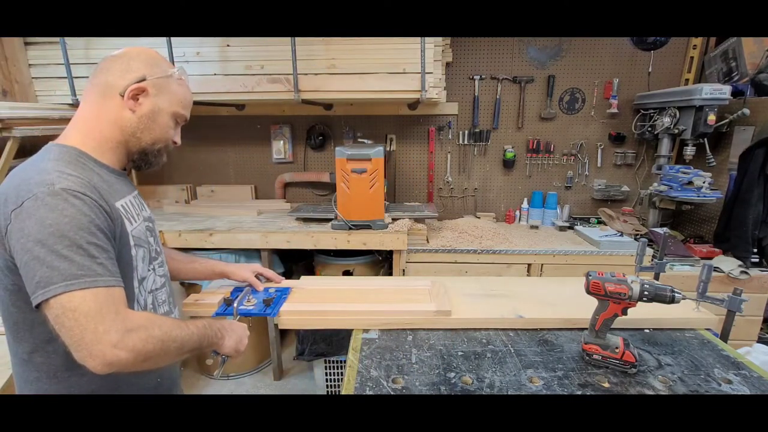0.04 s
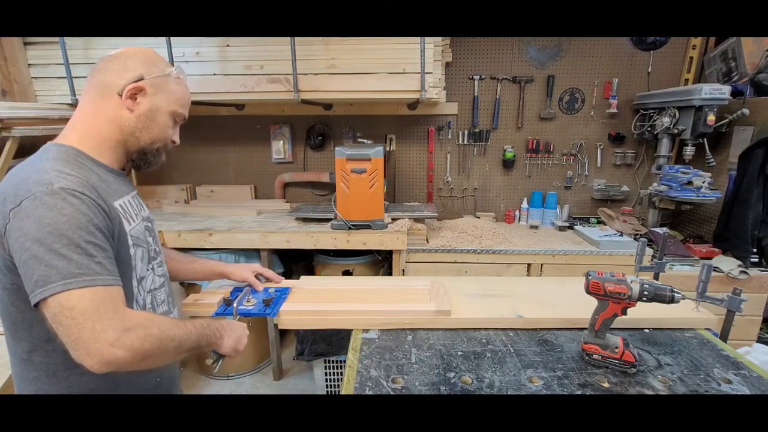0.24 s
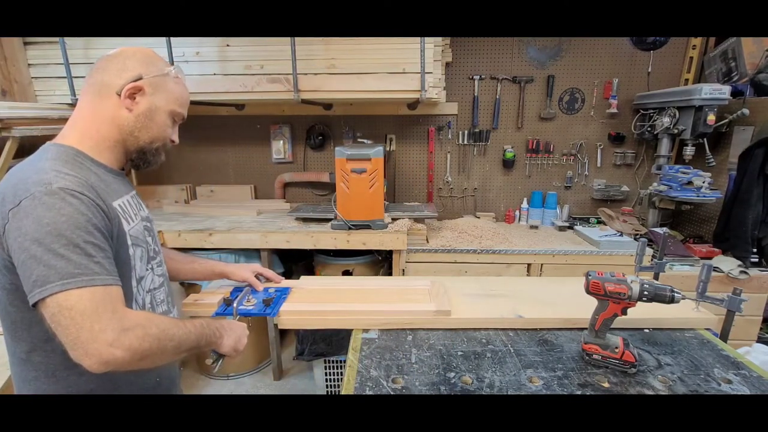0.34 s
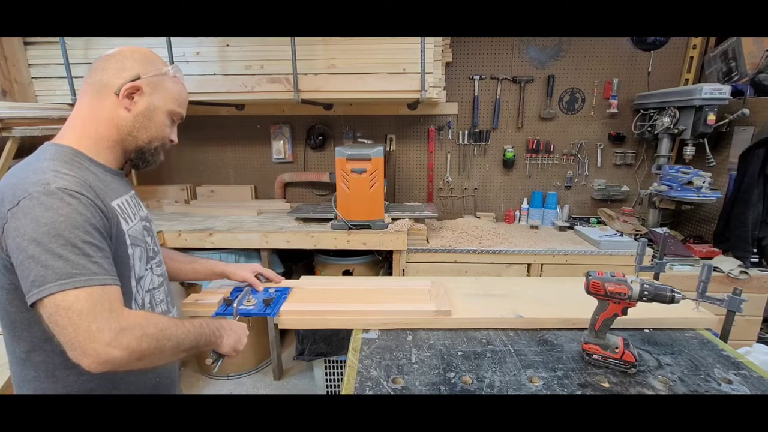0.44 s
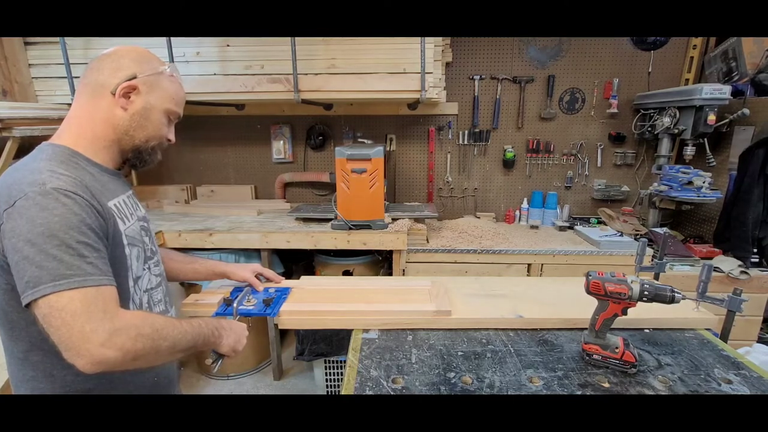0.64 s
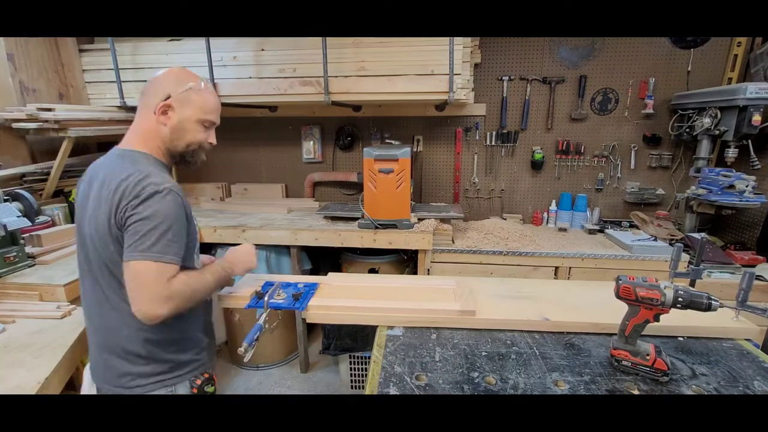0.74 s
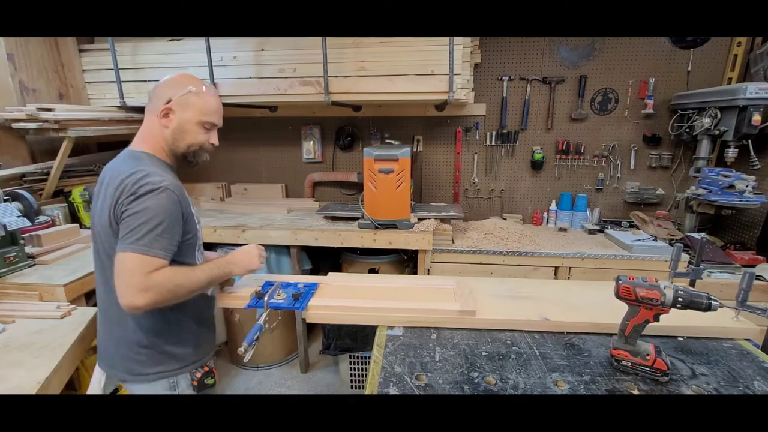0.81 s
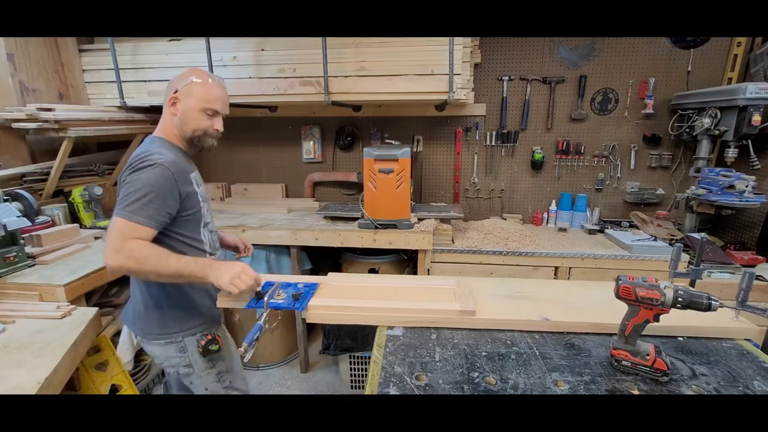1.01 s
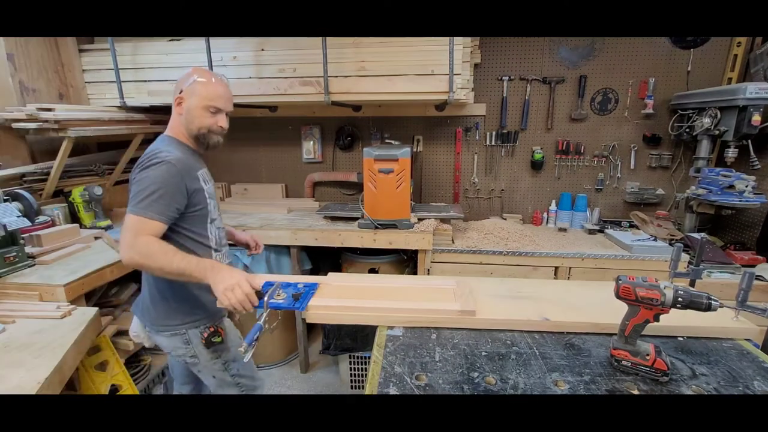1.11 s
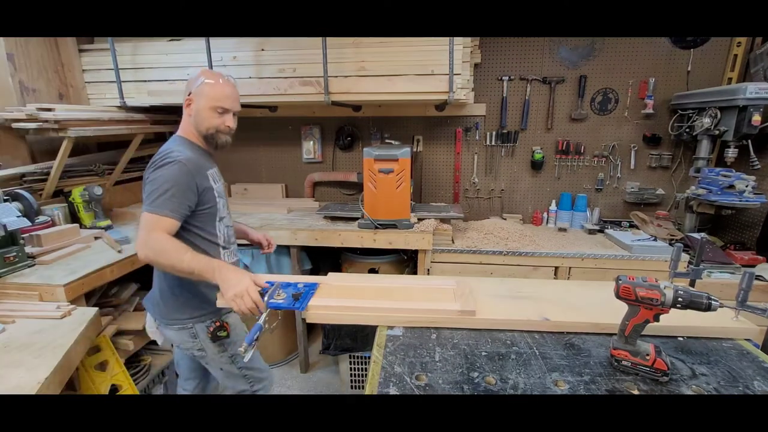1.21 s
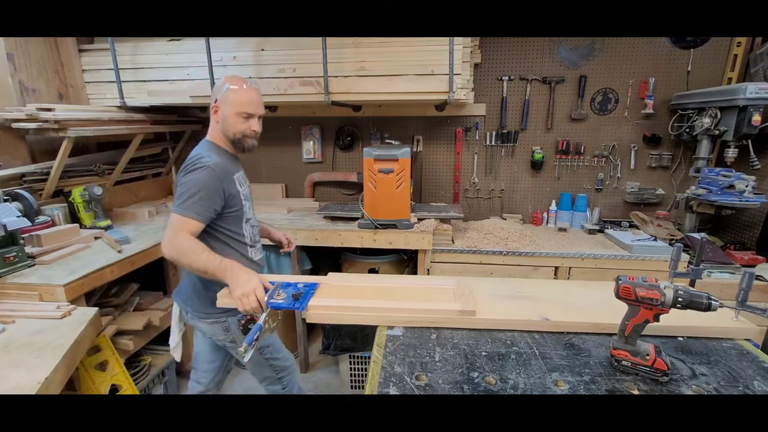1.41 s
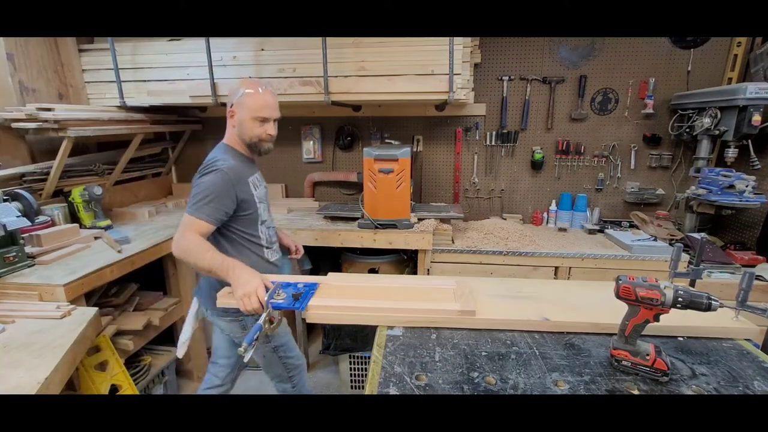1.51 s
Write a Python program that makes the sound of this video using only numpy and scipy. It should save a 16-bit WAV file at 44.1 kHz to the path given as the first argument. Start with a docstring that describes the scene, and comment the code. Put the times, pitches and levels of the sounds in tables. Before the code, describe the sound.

A steel locking clamp cracks shut on plastic and wood, with a short clanky ring and room echo; then very quiet steps, rustling clothes and a soft double knock, close microphone in a cluttered workshop.

```python
"""A steel locking clamp snaps shut on a plastic jig and a wooden board in a cluttered workshop.
The lever slides (noise), cracks home (short noise bursts) and sets clamp, board and bench ringing
(wavering sines and a wash of noise) into the room. Then someone steps back (dull sine thuds) with
rustling clothes (fluttering noise) and knocks lightly on the clamped jig (soft taps and the same sines).
A tiny steel tick and soft hollow rubs are mixed in, over the still air of the shop (steady noise)."""
import sys
import numpy as np
from scipy import signal
from scipy.fft import rfft, irfft
from scipy.io import wavfile
from scipy.ndimage import uniform_filter1d

SR = 44100
rng = np.random.default_rng(int(sys.argv[2]) if len(sys.argv) > 2 else 0)


def dump_mix(stems):
    """Bounce the given channels to the path in sys.argv[1] as a 16-bit WAV at rate SR."""
    frames = np.atleast_2d(stems).T  # one column per channel
    limited = np.clip(frames, -1, 1)  # hard clip at full scale
    pcm = np.round(limited * 32767).astype(np.int16)
    wavfile.write(sys.argv[1], SR, pcm)


N = 68355
T = np.arange(N) / SR  # time in seconds
LEFT_RIGHT = np.array([[.5], [-.5]])  # shares a level difference between left and right
RAGGED_DB = 3  # unevenness of the lever slide and the washes, before it is eased off in the bass

# how much louder the left side is: [pitch_hz, left_minus_right_db]
SIDE_BALANCE = [(60, -1.5), (130, -2.5), (280, 0), (550, 0), (1200, 0), (3000, 1), (8000, 0.5),
                (14000, -0.5)]


def from_db(db):
    """Turn decibels into a gain."""
    return 10 ** (np.asarray(db) / 20)


def at_hz(points, hz):
    """Read a table between its points, along a log-frequency axis."""
    table_hz, values = np.transpose(points)
    return np.interp(np.log(hz), np.log(table_hz), values)


def dying(t60):
    """Fading envelope that loses 60 dB in t60 seconds."""
    return np.exp(-np.log(1000) * T / t60)


def later(x, s):
    """Delay a sound by s seconds."""
    n = round(s * SR)
    return np.pad(x, [(0, 0)] * (x.ndim - 1) + [(n, 0)])[..., :N]


def from_left(x):
    """The direct sound reaches the left microphone first."""
    right_lag_s = .00021
    return np.array([x, np.interp(T - right_lag_s, T, x, left=0)])


def noise(spectrum, ragged_db=0):
    """Steady stereo noise of a given colour, rms 1; raggedness scatters narrow resonances through it."""
    # how alike left and right are: [pitch_hz, likeness from -1 (opposite) to 1 (same)]
    likeness = [(60, 0.48), (130, 1), (280, -0.012), (550, -0.3), (1200, -0.23), (2500, -0.087),
                (12000, -0.42)]
    peak_width_hz = 45
    hz = np.maximum(np.arange(N // 2 + 1) * SR / N, 1)
    peak_shape = np.exp(-((hz[:401] - hz[200]) / (peak_width_hz / 2)) ** 2)
    peaks = signal.fftconvolve(rng.standard_normal(len(hz)), peak_shape, "same")
    # tanh limits the peaks; the last factor keeps the bass smoother
    ragged = ragged_db * np.tanh(peaks / peaks.std()) * hz / (hz + 1500)
    gain = from_db(at_hz(spectrum, hz) + ragged + at_hz(SIDE_BALANCE, hz) * LEFT_RIGHT)
    alike = at_hz(likeness, hz)
    mid, side = rfft(rng.standard_normal((2, N)))
    stereo = np.sqrt(1 + alike) * mid + np.sqrt(1 - alike) * side * [[1], [-1]]
    x = irfft(gain * stereo, N)
    return x / x.std()


def evened(x, hz):
    """Hold the level of a band steady over some cycles, so that only its fine grain varies."""
    window = int(SR * (.006 + 5 / hz))
    power = uniform_filter1d(np.mean(x ** 2, axis=0), window)
    return x * np.sqrt(power.mean() / (np.abs(power) + 1e-20))


def diffuse(spectrum, ragged_db=0):
    """Coloured noise that swells within a few cycles and dies band by band as the room does."""
    # how long the room rings: [pitch_hz, t60_s]
    room_t60 = [(60, 0.46), (200, 0.36), (700, 0.28), (1300, 0.29), (2000, 0.27), (4000, 0.26),
                (7500, 0.23), (15000, 0.175)]
    build_cycles = 1.8
    rest, out = noise(spectrum, ragged_db), 0
    for hz in 60 * 2 ** np.arange(9):  # octave bands, peeled off from the bass up
        top_hz = min(hz * np.sqrt(2), .49 * SR)
        band = signal.sosfiltfilt(signal.butter(3, top_hz, fs=SR, output="sos"), rest)
        rest = rest - band
        build = 1 - np.exp(-T * hz / build_cycles)
        steady = np.roll(evened(band, hz), N // 2, axis=1)  # start away from the filtered edges
        out = out + steady * dying(at_hz(room_t60, hz)) * build
    return out


def room(x):
    """Reflections from shelves and walls, as strong as the sound that feeds them."""
    first_delay_s = .004
    response = later(diffuse([(20, 0), (20000, 0)]), first_delay_s)
    response = response / np.sqrt(np.sum(response ** 2) / 2)
    return signal.fftconvolve(x[None], response, axes=1)[:, :N]


def clamp_snap():
    """A lever slide, a burst of steel contacts with its echoes, then the ringing body and its wash."""
    # steel contacts as the lever goes home, each duller: [after_snap_s, relative_level_db, top_hz]
    contacts = [(0.0002, -0.5, 15000), (.0009, 2.5, 11000), (.0024, 0.5, 5500)]
    # early echoes from bench top and shelves: [after_direct_s, level_db relative to the crack]
    early_echoes = [(.0095, -15), (.024, -19)]
    # colour of the lever sliding just before it snaps: [pitch_hz, relative_db_per_hz]
    slide_colour = [(300, -14), (1500, -6), (3000, -8), (5000, -2), (6500, 0.5), (8000, -3), (11000, -18.5),
                    (16000, -25.5)]
    # colour of the dense higher modes and reflections: [pitch_hz, relative_db_per_hz]
    wash_colour = [(45, -28), (110, -11), (170, -8), (250, -11.5), (400, -7.5), (560, -14), (760, -10.5),
                   (1000, -4.5), (1350, 2), (1800, -11.5), (2550, -9), (3600, -17), (5000, -17.5),
                   (6200, -12), (7500, -21), (10000, -25), (11700, -36.5), (13200, -25), (14800, -26),
                   (15600, -50)]
    snap_s, body_delay_s = 0.2406, .0018
    slide_db, crack_db, modes_db, wash_db = -30.5, -5.5, -1, -12.5
    slide_rise_s = 0.038  # time to rise by 60 dB

    # a fading envelope played backwards grows until the snap
    slide_rise = np.interp(snap_s - T, T, dying(slide_rise_s), left=0)
    slide = from_db(slide_db) * noise(slide_colour, RAGGED_DB) * slide_rise
    crack = sum(later(from_db(crack_db + db) * contact(top_hz), s) for s, db, top_hz in contacts)
    echoes = sum(later(from_db(db) * crack[::-1], s) for s, db in early_echoes)  # sides swapped
    wash = from_db(wash_db) * diffuse(wash_colour, RAGGED_DB)
    ring = later(from_db(modes_db) * struck_body(by_hand=False) + wash, body_delay_s)
    panned_crack = crack * from_db(5 * LEFT_RIGHT)  # 5 dB towards the left
    return slide + later(panned_crack + echoes + ring, snap_s)


def contact(top_hz):
    """One hard touch of steel: a few milliseconds of noisy crack, dulled above top_hz."""
    # colour before dulling: [pitch_hz, relative_db_per_hz]
    crack_colour = [(150, -35.5), (700, -22.5), (1300, -5), (1900, -8.5), (3000, -5.5), (4600, -1.5),
                    (6200, 5), (8200, -6.5), (9800, -7), (11500, -17.5), (14000, -10.5), (16000, -22.5)]
    crack_t60_s = 0.0058
    dull = signal.butter(2, top_hz, fs=SR, output="sos")
    return from_left(signal.sosfilt(dull, noise(crack_colour)[0]) * dying(crack_t60_s))


def struck_body(by_hand):
    """One blow starts all modes of the clamped parts; they ring unsteadily, direct and through the room."""
    # modes of bench, board, jig and clamp, levels relative:
    # [pitch_hz, snap_level_db, hand_level_db, t60_s before any damping by the hand]
    modes = [(113.6, -31.5, -24.5, 0.46), (126.7, -32, -26, 0.3), (190.4, -32.5, -30, 0.4),
             (346.5, -23.5, -32, .22), (374, -19, -13.5, 0.11), (661, -32.5, -12.5, 0.22),
             (864, -27, -17, 0.16), (914.6, -26, -24, 0.22), (1114.3, -15, -30, 0.11),
             (1161, -18.5, -30, 0.21), (1272, -19, -20, 0.22), (1303, -13, -9.5, 0.25),
             (1350, -21.5, -15.5, 0.29), (1381, -16.5, -18, 0.28), (1498.5, -21, -16, 0.13),
             (1690, -26, -21, 0.33), (2024, -31, -39, 0.38), (2153, -24.5, -15, .12),
             (2554, -28, -37, 0.19), (2807, -28, -27, .18), (3194, -33.5, -40, .2), (5285, -31, -55, 0.16),
             (5790, -29.5, -55, .17), (5914, -18.5, -57, 0.054), (5984, -22.5, -55, 0.18),
             (6540, -27.5, -52, .19), (9730, -34, -70, 0.12), (13150, -36.5, -75, .13),
             (14300, -35, -75, .1)]
    build_cycles, room_db = 1.1, -13.5
    # the parts shift as they settle, so each ring wavers in pitch and level
    pitch_share, level_db = .005, 1
    direct, mono = 0, 0
    for hz, snap_db, hand_db, t60 in modes:
        strength = from_db((hand_db if by_hand else snap_db) + level_db * waver())
        pitch = hz * (1 + pitch_share * waver() / (1 + hz / 4000))  # high modes waver by a smaller share
        cycles = np.cumsum(pitch) / SR
        build = 1 - np.exp(-T * hz / build_cycles)
        mode = strength * np.sin(2 * np.pi * cycles) * dying(t60) * build
        direct = direct + from_left(mode) * from_db(at_hz(SIDE_BALANCE, hz) * LEFT_RIGHT)
        mono = mono + mode
    return direct + from_db(room_db) * room(mono)


def waver():
    """Random drift around 0, gliding in straight lines between a new value every 10 ms or so."""
    step_s = 0.00997
    return np.interp(T / step_s, np.arange(600), rng.standard_normal(600))


def hand_knocks():
    """A soft contact gives a dull tap and excites the same body, with much less treble."""
    # soft knocks of a hand on the jig: [start_s, relative_level_db]
    knocks = [(1.3282, -34.5), (1.3358, -29.5)]
    # colour of tap and wash: [pitch_hz, relative_db_per_hz]
    knock_colour = [(60, -32), (150, -2.5), (280, -0.5), (450, -4), (660, 2), (1000, -17), (1360, -0.5),
                    (1800, -25), (2400, -23), (3000, -24), (4000, -40), (8000, -34), (16000, -52)]
    tap_db, modes_db, wash_db = -14.5, -3.5, -18
    tap_t60_s = .018
    hand_t60_s = 0.44  # the resting hand shortens the ring
    body = from_db(modes_db) * struck_body(by_hand=True) * dying(hand_t60_s)
    out = 0
    for s, db in knocks:
        tap = from_db(tap_db) * noise(knock_colour) * dying(tap_t60_s)
        wash = from_db(wash_db) * diffuse(knock_colour, RAGGED_DB)
        out = out + from_db(db) * later(tap + body + wash, s)
    return out


def fading_sine(level_db, hz, t60):
    """A pure tone that starts at once and dies away."""
    return from_db(level_db) * np.sin(2 * np.pi * hz * T) * dying(t60)


def ticks():
    """A light touch sets one mode of the clamp's steel ringing, direct and through the room."""
    # tiny tick: [start_s, level_db, pitch_hz, t60_s]
    tick_table = [(1.259, -66.5, 5152, .09)]
    x = sum(later(fading_sine(db, hz, t60), s) for s, db, hz, t60 in tick_table)
    return from_left(x) + from_db(-3) * room(x)


def footfalls():
    """Short dull thuds of heel and sole, heard directly and through the room."""
    # thuds: [start_s, level_db, pitch_hz]
    steps = [(0.769, -51, 265), (.795, -48, 244.3), (.869, -44, 363), (.876, -44, 258), (.897, -49.5, 202),
             (1.437, -45, 252.5), (1.445, -42, 393), (1.489, -50, 241), (1.521, -46, 259)]
    thud_t60_s, room_db = 0.039, -0.5
    x = sum(later(fading_sine(db, hz, thud_t60_s), s) for s, db, hz in steps)
    return from_left(x) + from_db(room_db) * room(x)


def brushes():
    """Sleeves and soles brush: each swells and fades in one band of friction noise."""
    # [peak_s, relative_level_db, rise_s (by 20 dB), fall_s (by 40 dB), centre_hz, width_octaves]
    brush_table = [(.015, -70, 0.054, 0.19, 1136, 0.31), (.568, -61, .014, 0.13, 1650, .2),
                   (0.574, -68.5, 0.022, 0.19, 6200, 0.15), (0.587, -57, 0.023, 0.2, 1190, 0.69),
                   (0.615, -58, 0.081, 0.19, 606, 0.48), (.87, -67, 0.13, 0.39, 1100, 0.42),
                   (0.924, -59.5, 0.058, 0.19, 2290, 0.46), (0.994, -62.5, 0.052, 0.23, 1188, 0.73),
                   (1.502, -64.5, 0.11, 0.16, 1140, 0.96)]
    out = 0
    for s, db, rise, fall, hz, octaves in brush_table:
        drop_db = 20 * np.maximum((s - T) / rise, 2 * (T - s) / fall)
        out = out + from_db(db - drop_db) * hump(hz, octaves)
    return out


def hump(hz, octaves):
    """Noise in one resonance: 6 dB down at the given octaves to each side, duller far above."""
    grid = np.geomspace(20, 18000, 120)
    resonance_db = -20 * np.log10(1 + (np.log2(grid / hz) / octaves) ** 2)
    treble_loss_db = -20 * np.log10(1 + (grid / (hz * 5)) ** 2)
    return noise(np.c_[grid, resonance_db + treble_loss_db])


def clothes():
    """Clothes rustle: coloured noise whose level follows the movement."""
    # level over time: [time_s, relative_level_db]
    rustle = [(0, -66), (.1, -77.5), (.55, -82.5), (.575, -64.5), (.68, -78), (.76, -80), (.86, -62),
              (.935, -61.5), (.98, -64), (1.1, -69.5), (1.23, -66.5), (1.27, -63.5), (1.32, -66),
              (1.35, -62.5), (1.42, -63), (1.5, -55), (1.55, -60.5)]
    # colour: [pitch_hz, relative_db_per_hz]
    cloth_colour = [(200, 2), (1000, 2.5), (2500, -1), (4000, -4), (6800, -6), (8200, -18), (11000, -16),
                    (14500, -15.5), (16000, -28.5)]
    return from_db(np.interp(T, *np.transpose(rustle))) * noise(cloth_colour)


def grain():
    """Cloth catches and slips: a quick uneven flutter of level."""
    flutter_db, mean_gap_s = 1, 0.0032
    knots = np.cumsum(rng.uniform(.5, 1.5, 2000)) * mean_gap_s
    return from_db(flutter_db * np.interp(T, knots, rng.standard_normal(len(knots))))


def swells():
    """Small hollow rubs and the floor giving underfoot: soft pressure stirs one narrow resonance."""
    # [peak_s, level_db, length_s (peak to about 9 dB down), pitch_hz]
    swell_table = [(0.501, -63.5, 0.024, 350), (0.82, -64.5, 0.049, 282), (1.023, -59.5, 0.042, 442),
                   (1.055, -65, 0.052, 642), (1.215, -60, 0.018, 920), (1.228, -68, 0.024, 362),
                   (1.298, -58.5, .03, 88), (1.513, -60.5, 0.034, 79)]
    width_octaves = 0.21
    out = 0
    for s, db, length, hz in swell_table:
        swell = np.exp(-((T - s) / length) ** 2)
        out = out + from_db(db) * swell * hump(hz, width_octaves)
    return out


def still_air():
    """The still air of the shop: faint, steady coloured noise."""
    # colour: [pitch_hz, relative_db_per_hz]
    air_colour = [(25, -23), (50, -12.5), (80, 2), (130, -10.5), (250, -18), (450, -14.5), (800, -23.5),
                  (1400, -26), (2500, -33.5), (7000, -48.5), (10000, -45), (14000, -38), (16000, -45)]
    return from_db(-64.5) * noise(air_colour)


def scene():
    """Clamp, knocks and movement over the still air of the shop."""
    clamp = clamp_snap() + hand_knocks() + ticks()
    movement = footfalls() + (brushes() + clothes()) * grain() + swells()
    return clamp + movement + still_air()


def record(dry):
    """The top is cut, and the highest peaks are rounded."""
    cutoff_hz, ceiling = 16900, .88
    cut = signal.cheby2(12, 60, cutoff_hz, fs=SR, output="sos")
    x = signal.sosfilt(cut, dry)
    rounded = x / (1 + (x / ceiling) ** 6) ** (1 / 6)
    return signal.sosfiltfilt(cut, rounded)


dry = scene()
out = record(dry)
dump_mix(out)
```